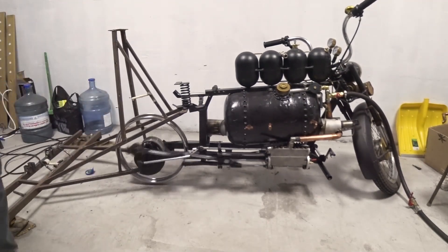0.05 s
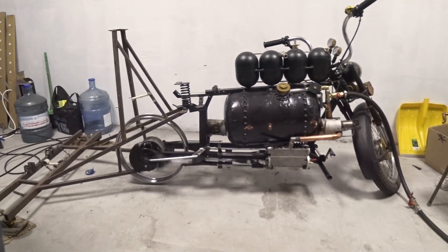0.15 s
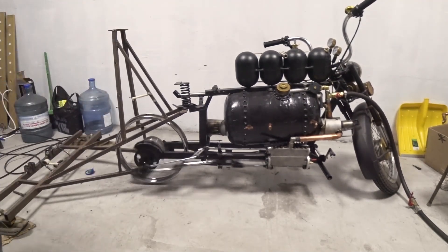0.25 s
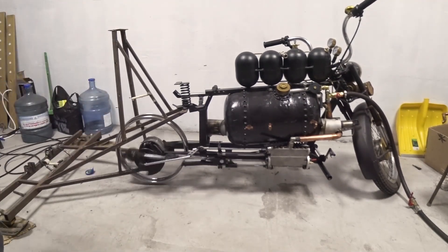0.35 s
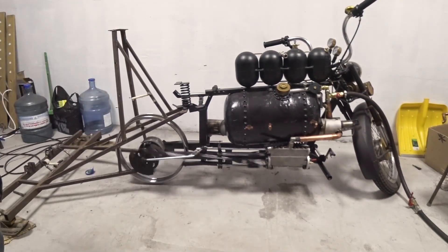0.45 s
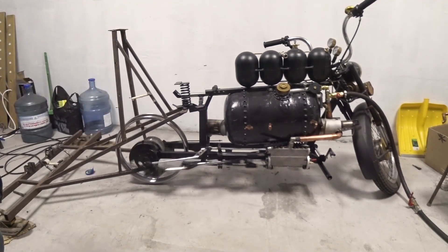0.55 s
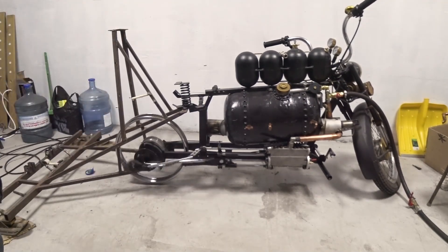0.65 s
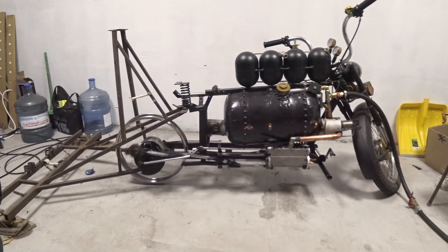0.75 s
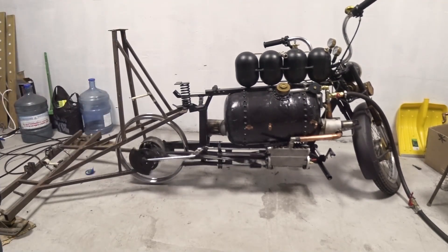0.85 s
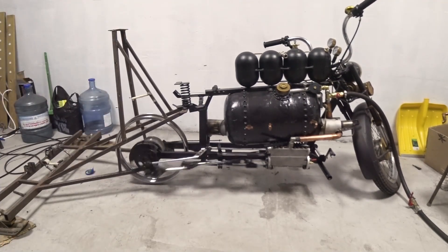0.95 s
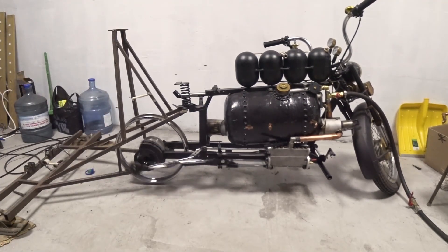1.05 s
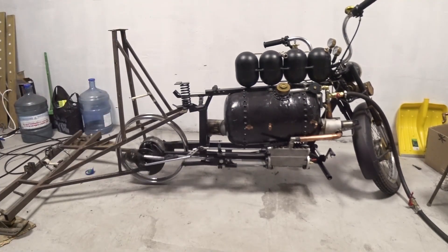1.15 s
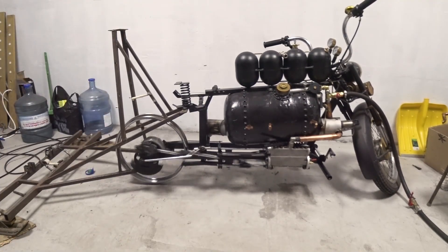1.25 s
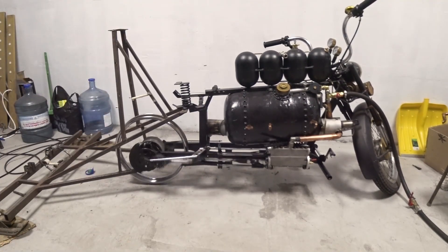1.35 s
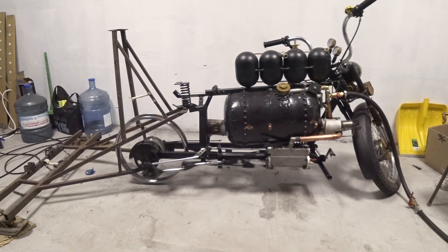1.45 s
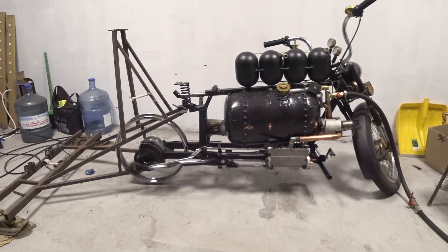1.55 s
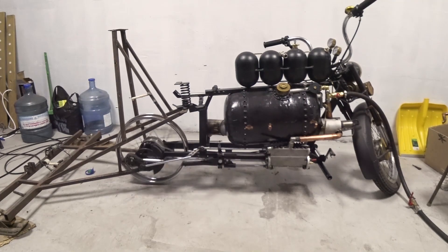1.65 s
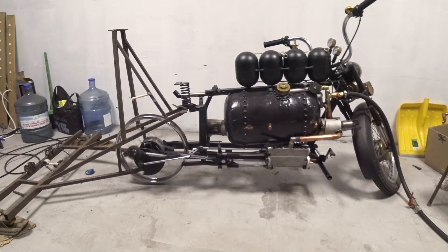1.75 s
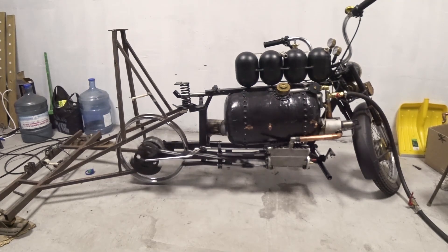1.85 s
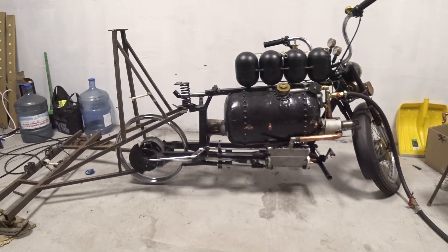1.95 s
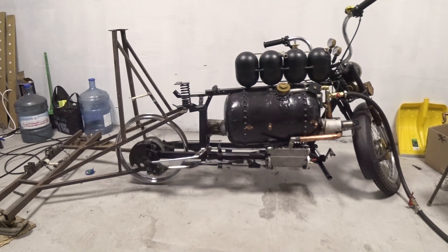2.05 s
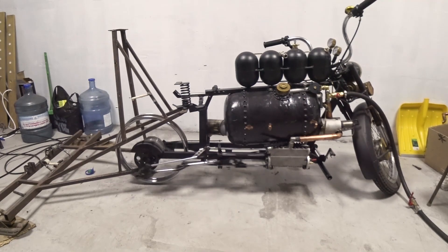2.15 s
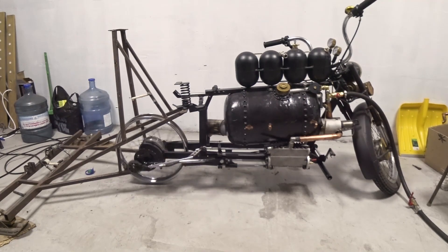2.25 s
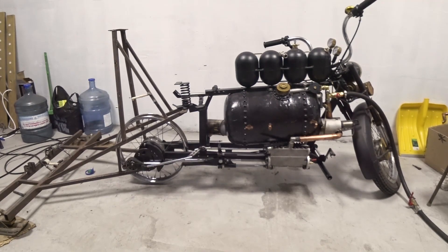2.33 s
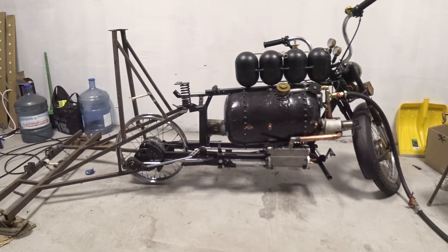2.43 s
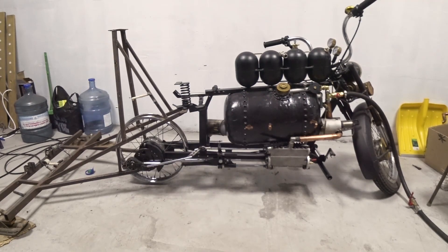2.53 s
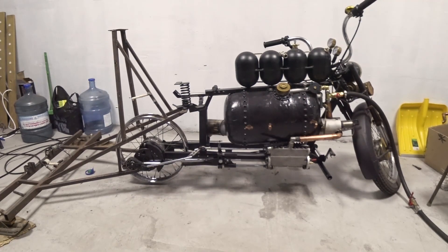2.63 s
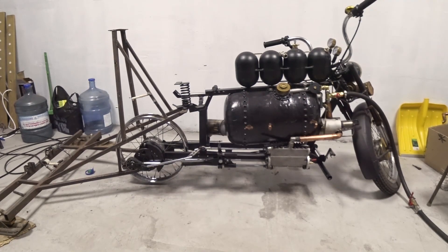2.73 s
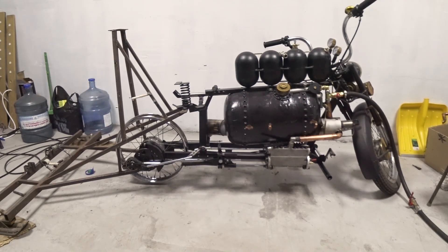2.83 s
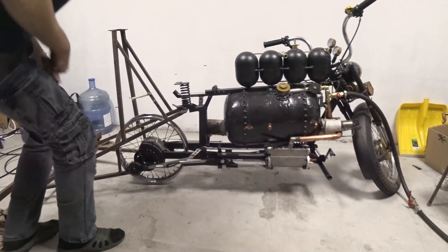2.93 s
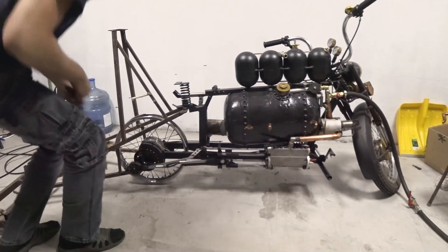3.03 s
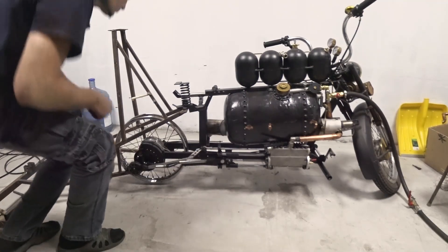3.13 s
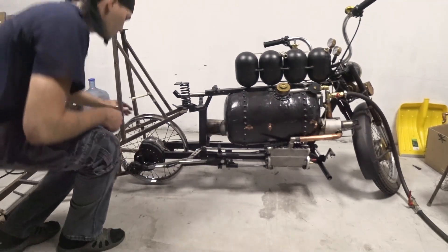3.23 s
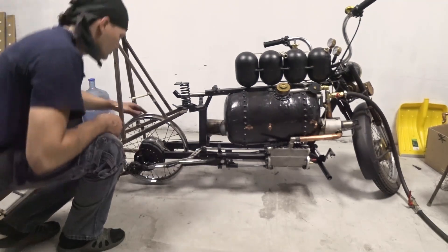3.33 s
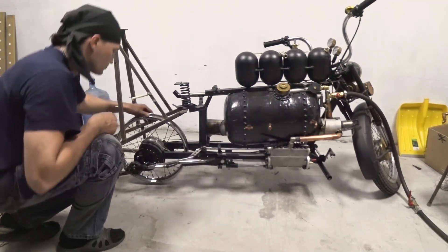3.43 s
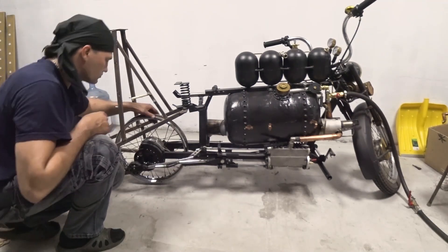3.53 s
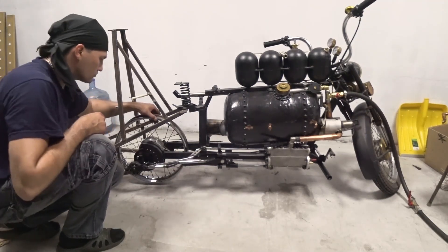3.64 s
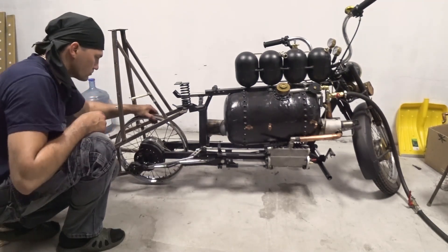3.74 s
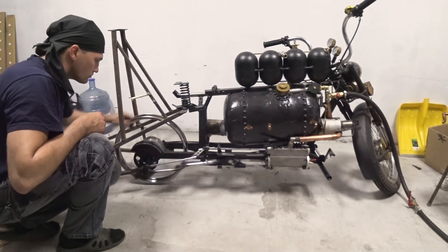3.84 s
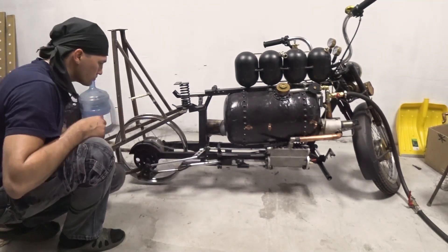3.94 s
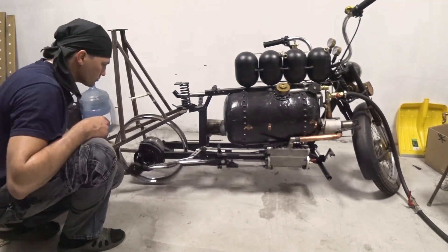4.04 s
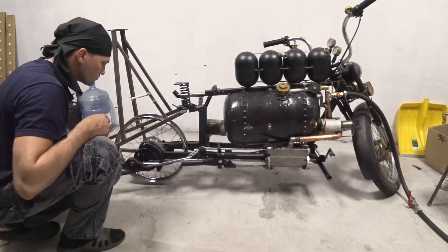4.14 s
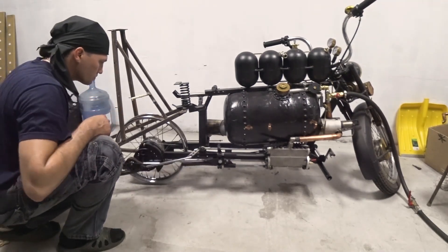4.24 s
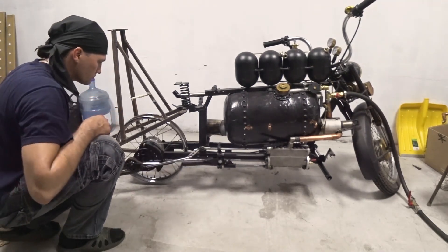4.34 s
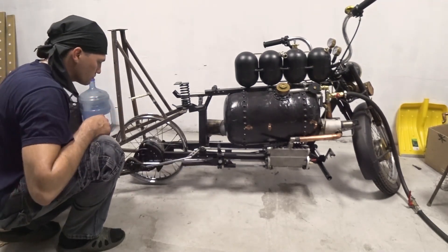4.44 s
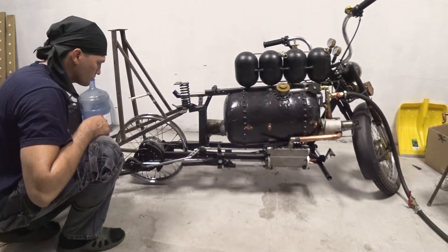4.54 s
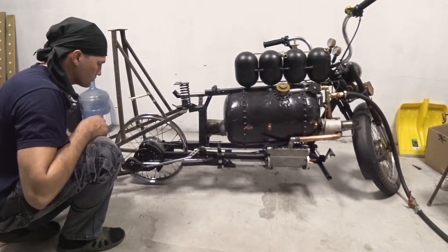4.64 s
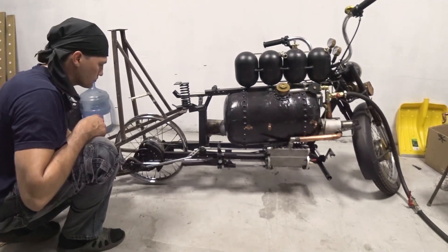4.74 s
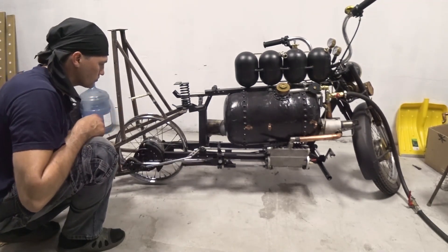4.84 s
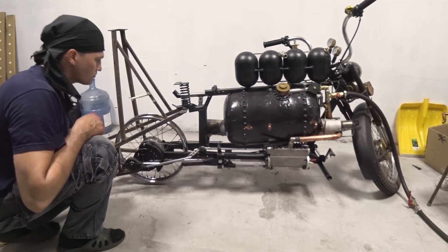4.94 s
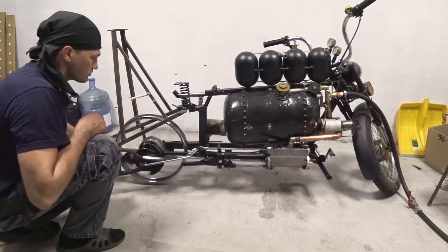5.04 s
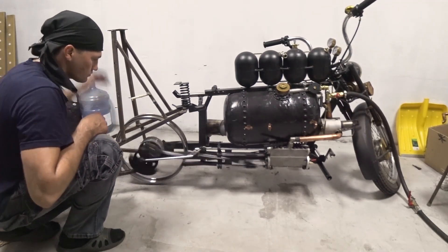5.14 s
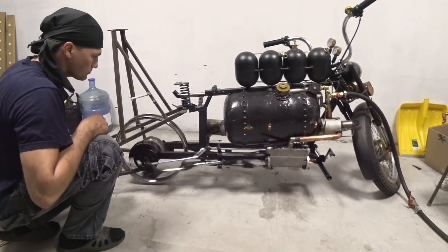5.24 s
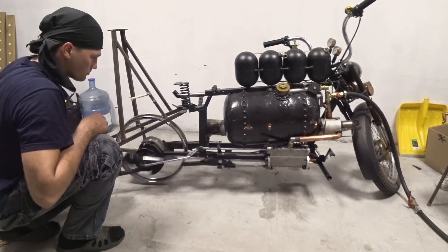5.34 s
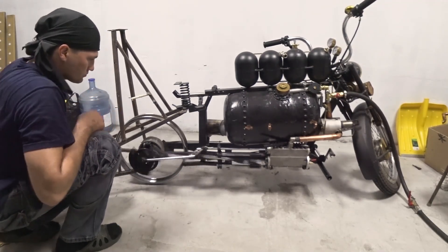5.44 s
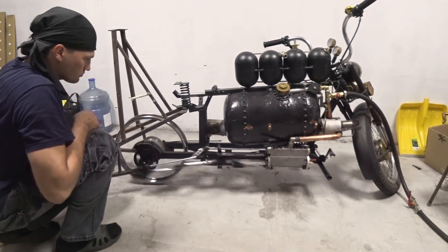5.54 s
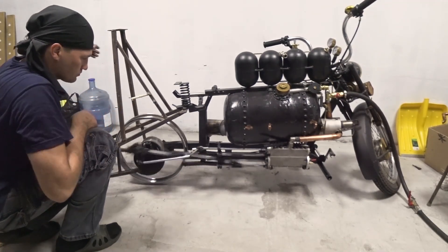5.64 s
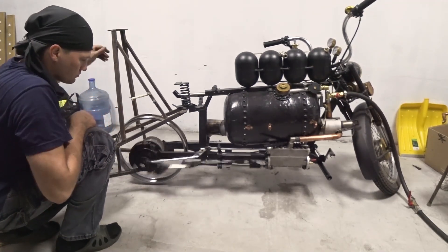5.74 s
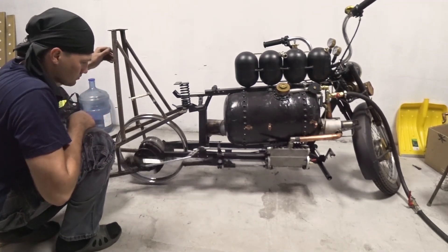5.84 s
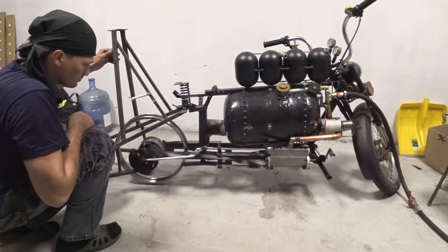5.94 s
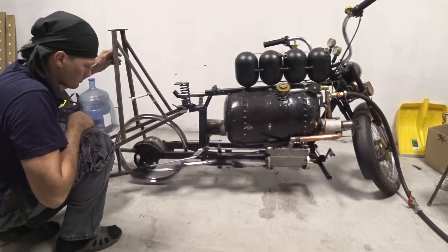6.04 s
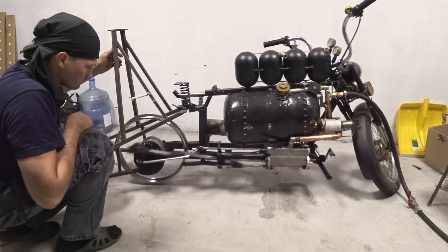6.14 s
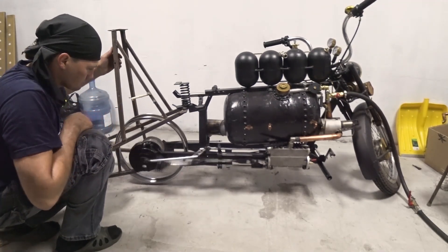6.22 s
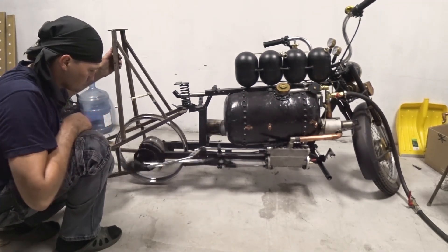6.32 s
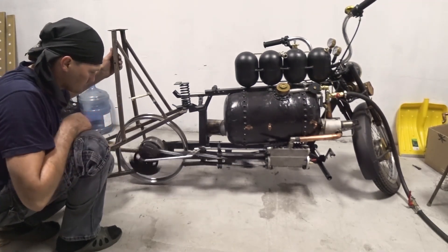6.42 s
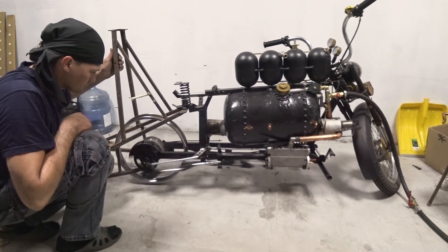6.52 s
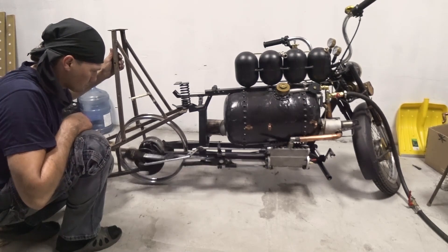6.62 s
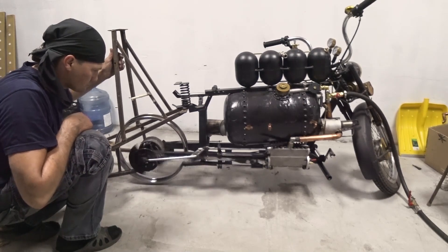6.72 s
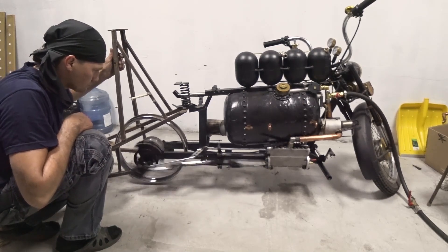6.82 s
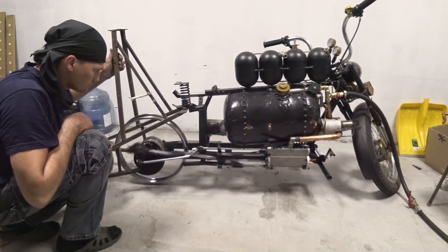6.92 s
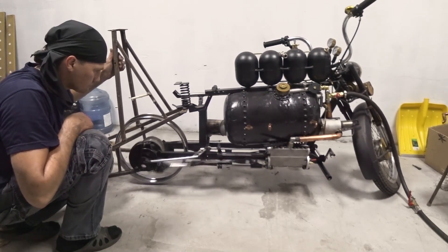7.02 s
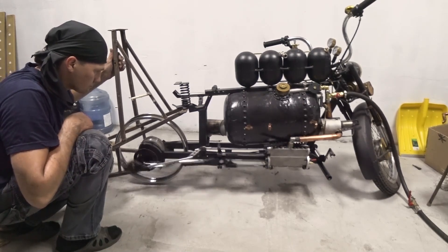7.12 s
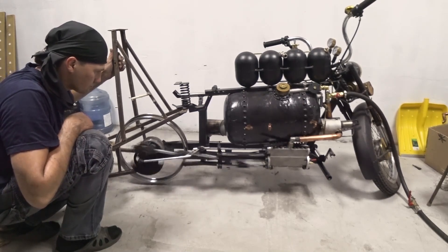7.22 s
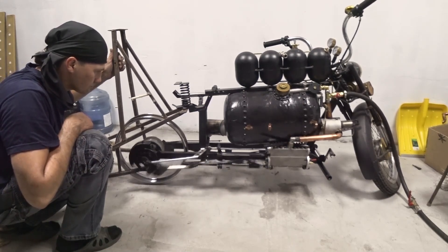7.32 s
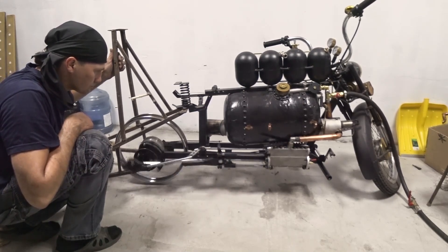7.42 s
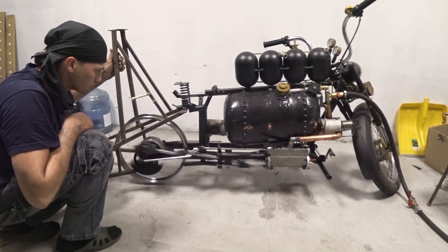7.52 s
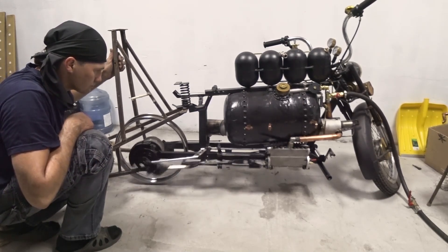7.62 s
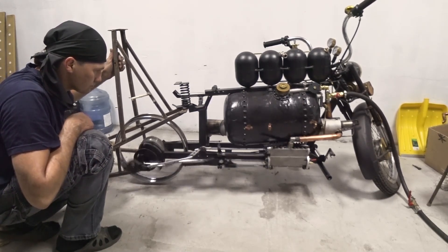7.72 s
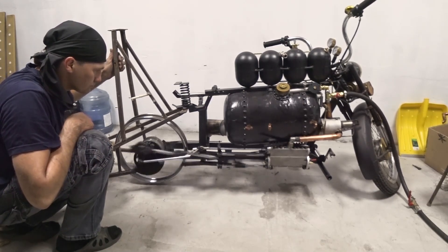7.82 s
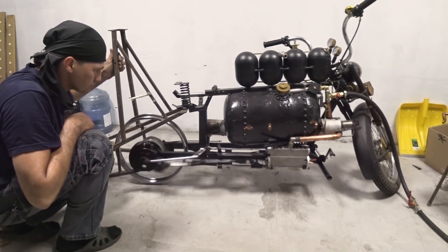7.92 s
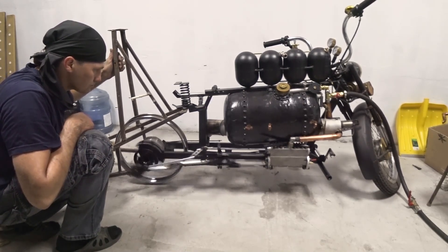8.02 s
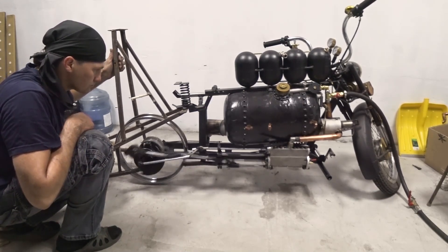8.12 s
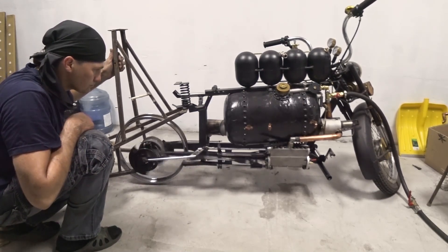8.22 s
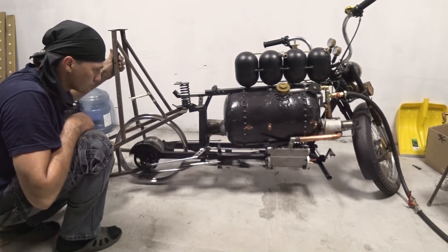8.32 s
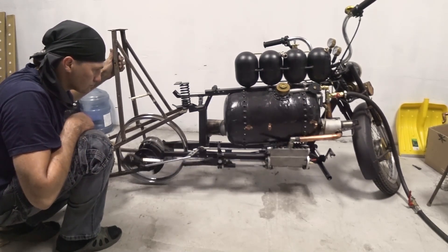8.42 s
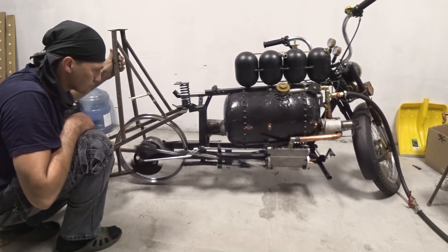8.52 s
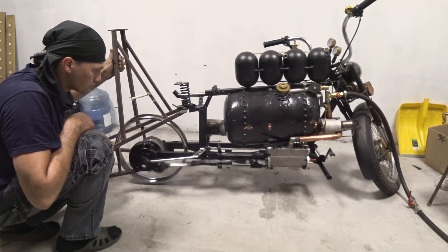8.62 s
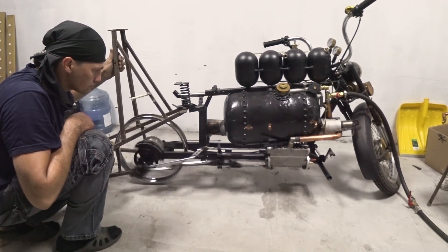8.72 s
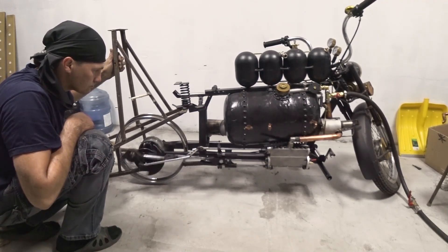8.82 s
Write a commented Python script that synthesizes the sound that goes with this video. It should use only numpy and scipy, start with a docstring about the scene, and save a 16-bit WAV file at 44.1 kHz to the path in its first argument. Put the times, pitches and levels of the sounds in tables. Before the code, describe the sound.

Rhythmic blasts of escaping air dominate: a short hollow inlet rush, a valve crack with a piercing spit, then a broad, high hiss cut off as the cylinder empties. The beats slow and stop, leaving thin whistles, hollow line howl, small metallic clicks and low drone. After a single puff and a snap, the engine restarts fast and strong, then slackens. Close, mono-like pickup with pumping gain in a short-echoing garage.

```python
"""A homemade piston engine runs on compressed air straight ahead: it slows, stalls, is fed and picks up.
Each turn the exhaust valve cracks with a whistling spit, then dumps the cylinder in a hissing blast.
Inlet rush, valve clicks, leaks at rest and the hiss of the feed line are shaped noise in a hard garage.
The feed line's howl, the shaking frame, a machine drone and room noise are added dry, with no garage echo.
The recorder's gain control ducks everything under each blast; both channels are alike."""
import sys
import numpy as np
from scipy import signal
from scipy.fft import rfft, irfft, next_fast_len
from scipy.io import wavfile
from scipy.ndimage import uniform_filter1d

SR = 44100
rng = np.random.default_rng(int(sys.argv[2]) if len(sys.argv) > 2 else 0)


def to_wav(sig):
    """Store sig (one row per channel, or 1-D mono) as 16-bit WAV at the path in sys.argv[1].

    Samples outside -1..1 are clipped; the rate is SR.
    """
    pcm = np.clip(np.atleast_2d(sig), -1, 1) * 32767
    pcm = np.round(pcm).astype(np.int16)
    wavfile.write(sys.argv[1], SR, pcm.T)  # frames by channels


N = 391160
TIME, FREQS = np.arange(N) / SR, np.fft.rfftfreq(N, 1 / SR)

# Levels in the colour and resonance tables are relative: each layer is brought to rms 1 before its own level.
# A resonance's width is the distance from its centre to half amplitude.

# Noise of the room. Each row: frequency in Hz, density in dB per Hz.
ROOM_COLOUR = [(20, -10), (60, 1), (110, -17), (170, -8.5), (260, -17), (420, -20.5), (750, -18.5),
               (1300, -33), (2200, -30), (3000, -32.5), (8000, -31), (15000, -45)]
# Machine drone in the garage. Each row: frequency in Hz, relative level in dB.
DRONE_PARTIALS = [(26.5, -39.5), (45.2, -49), (90.4, -45), (135.6, -47)]
# Swell of that drone. Each row: time in seconds, gain in dB.
DRONE_SWELL = [(0, -4), (1.9, -12), (2.5, -2), (3.2, -3.5), (3.8, 4.5), (5.1, 4.5), (5.6, 1), (8.87, -4)]
# Rumble of crank and wheel. Each row: frequency in Hz, density in dB per Hz.
RUMBLE_COLOUR = [(15, -36), (27, -61), (38, -8), (60, 3.5), (90, -15), (145, -3.5), (220, -19.5),
                 (600, -20.5), (1500, -20.5)]
# Swell of the rumble through a turn. Each row: turns after the exhaust, gain in dB.
TURN_SWELL = [(0, 3), (.25, 0), (.42, -7), (.52, 1.5), (.75, 0), (1, 1)]
# Hiss of the open feed line. Each row: frequency in Hz, density in dB per Hz.
FEED_COLOUR = [(30, -12), (75, 6.5), (130, -2), (220, -6.5), (700, -7), (1300, -3.5), (2000, -4.5),
               (3200, -10.5), (5500, -3), (7500, 2), (9500, 1.5), (10700, -5), (12300, -2), (14000, -13),
               (15700, -7.5)]
# Hollow howl of the feed line. Each row: frequency in Hz, width in Hz, level in dB.
HOWL_NOTES = [(875, 19.5, -5.5), (978, 19, -8.5), (1096, 16, -4.5), (1159.6, 20, 2.5), (1237, 18, -10),
              (1333, 40, -14), (1745, 20, -15)]
# The feed line is opened and stays open. Each row: time in seconds, hiss level in dB, howl level in dB.
FEED_FLOW = [(2.936, -19.5, -28), (2.95, -20.5, -29.5), (3.2, -26, -27), (3.5, -26, -27.5),
             (4.7, -27.5, -28.5), (5.2, -22, -28), (5.5, -15, -41), (7.6, -24.5, -34), (8.87, -31, -38)]
# Whistles of the leak with the piston at rest. Each row: frequency in Hz, width in Hz, level in dB.
SLACK_LEAK_NOTES = [(3480, 40, -19), (3750, 30, -13), (4480, 25, -3), (4830, 30, -11), (5180, 30, -10),
                    (7190, 140, -5), (7480, 180, -3), (8360, 55, 0), (8780, 150, -2), (9790, 150, -9),
                    (11100, 83, -10), (12200, 75, -3), (14550, 110, -19)]
# The same leak with the cylinder under pressure. Each row: frequency in Hz, width in Hz, level in dB.
STRAINED_LEAK_NOTES = [(3550, 35, -11), (5250, 90, -4.5), (7500, 110, 0), (8020, 50, 0), (8920, 190, 1),
                       (10000, 110, -9), (11970, 80, -4), (12380, 70, -4)]
# Leaks while the piston lingers or rests. Each row: start in seconds, end in seconds, swell in seconds,
# level in dB, share of the strained notes from 0 to 1.
RESTS = [(1.6, 1.97, .2, -32.5, .02), (2.3, 2.934, 0.56, -30.5, 0.2), (2.935, 3.92, 0.19, -25.5, 1),
         (4.2, 5.18, 0.37, -29, 0.07)]
# Snaps of the valve gear. Each row: start in seconds, level in dB, decay time in seconds.
CLICKS = [(0.851, -18, 0.0016), (1.289, -17.5, 0.0071), (1.871, -14.5, 0.0058), (3.033, -16.5, 0.013),
          (3.825, -24, 0.0067), (5.043, -19.5, 0.007), (5.171, -9.5, 0.0048)]
# Colour of those snaps. Each row: frequency in Hz, density in dB per Hz.
CLICK_COLOUR = [(150, -4), (600, -18), (1300, -26), (2400, -5.5), (4000, -13), (7500, -1.5), (10000, -7),
                (12500, -5), (15500, -32)]
# Air rushing into the cylinder. Each row: frequency in Hz, density in dB per Hz.
RUSH_COLOUR = [(40, -19), (140, -0.5), (300, -3), (500, 3.5), (650, 3), (850, 3), (1100, 2), (1800, 1.5),
               (2500, -4.5), (4000, 1), (5600, 1), (9000, -15), (15700, -45)]
# Hollow notes of the valve chest. Each row: frequency in Hz, width in Hz, level in dB.
CHEST_NOTES = [(390, 31, -17.5), (513, 25, -1.5), (632, 23, 6), (1107, 43, 4.5), (2510, 380, -2)]
# Piston pushing out the last air. Each row: frequency in Hz, density in dB per Hz.
SWEEP_COLOUR = [(100, -16), (500, -9), (1300, -8), (3000, -9), (4100, -4.5), (4900, 5.5), (6300, 4.5),
                (8000, 6.5), (9500, 7.5), (11000, 4), (13200, -11), (15700, -17)]
# Notes of the exhaust valve's seat. Each row: frequency in Hz, width in Hz, level in dB.
SEAT_NOTES = [(5840, 840, 9), (10400, 470, 11)]
# Exhaust through the barely open valve. Each row: frequency in Hz, density in dB per Hz.
WHISTLE_COLOUR = [(500, -24), (3000, -22.5), (4400, -16), (5700, -3), (6900, -19.5), (7700, -6.5),
                  (8800, -23.5), (9600, 2.5), (10250, 4), (11300, -7), (13200, -6), (15700, -13)]
# Exhaust through the wide open valve. Each row: frequency in Hz, density in dB per Hz.
BLAST_COLOUR = [(100, -46), (500, -19), (1300, -11), (2800, -13.5), (3900, -8.5), (4900, -8), (6500, 0),
                (8400, 3), (10000, 3.5), (11300, 2), (13300, 5.5), (14000, -2.5), (15700, -2.5)]
# Narrow fixed peaks that ring in the exhaust hiss. Each row: frequency in Hz, width in Hz, level in dB.
PEAK_NOTES = [(4928, 20, -8), (5890, 200, -6), (6520, 50, -5), (9087, 30, -7), (10193, 70, 0),
              (11000, 90, -7), (11900, 150, -7), (13044, 60, -3), (13311, 35, -4), (13497, 40, -4)]
# The turns of the engine. Each row: time the exhaust valve cracks in seconds, relative cylinder pressure
# in dB, how long the piston keeps pushing air out in seconds.
STROKES = [ (-.115, -3, 0.054), (.192, -5.5, 0.069), (0.53, -5, 0.074), (.913, -6, 0.081),
           (1.372, -4.5, 0.12), (1.962, -5, 0.21), (3.881, -0.5, 0.22), (5.223, 3.5, 0.14),
           (5.509, 0, 0.11), (5.769, 2.5, 0.11), (6.016, 4, 0.13), (6.265, 7.5, 0.12), (6.516, 5.5, 0.13),
           (6.78, 5, 0.11), (7.052, -1, 0.11), (7.336, -1.5, 0.1), (7.634, -3, 0.095), (7.95, -5.5, 0.095),
           (8.282, -7, 0.11), (8.638, -4, 0.1)]

# Valve timing: the inlet opens a share of a turn ahead; the exhaust is wide open a delay plus a share later.
INLET_TURNS, WIDE_DELAY_S, WIDE_TURNS, LONGEST_TURN_S = 0.1634, 0.0051, 0.09, 0.576
# The exhaust cracks in CRACK_S at the usual turn; the time follows a power law of the turn's length.
USUAL_TURN_S, CRACK_S, CRACK_POWER = 0.34, 0.0081, 1.87
# After a gap longer than STALL_S the crank starts from rest, and the inlet opens START_LEAD_S ahead.
STALL_S, START_LEAD_S = 1.0, 0.054
EMPTY_DB_PER_S = 88.5  # draining of the cylinder once the piston stops pushing
EDGE_HZ = 15900  # upper band limit of the recorder


def amp(db):
    """Decibels to gain."""
    return 10 ** (np.asarray(db) / 20)


def unit(x):
    """Scales to rms 1."""
    return x / np.sqrt(np.mean(x ** 2) + 1e-20)


def level(rows, axis=1):
    """Gain along a curve of seconds and dB, silent outside it."""
    columns = np.transpose(rows)
    inside = (TIME >= columns[0][0]) & (TIME <= columns[0][-1])
    return amp(np.interp(TIME, columns[0], columns[axis])) * inside


def hiss(colour):
    """Turbulent air as noise of a given colour, rms 1."""
    hz, db = np.transpose(colour)
    gain = amp(np.interp(np.log(FREQS + 1), np.log(hz), db))
    return unit(irfft(rfft(rng.standard_normal(N)) * gain, N))


def ringing(notes):
    """Turbulence exciting a set of resonances, rms 1."""
    power = sum(amp(db) ** 2 / (1 + ((FREQS - hz) / width) ** 2) ** 2 for hz, width, db in notes)
    return unit(irfft(rfft(rng.standard_normal(N)) * np.sqrt(power), N))


def wander(rate_hz):
    """Slow random drift below about the given rate, rms 1."""
    return unit(irfft(rfft(rng.standard_normal(N)) / (1 + (FREQS / rate_hz) ** 4), N))


def burst(start, rise, fall_db_per_s, length=0.9, hold=0):
    """Envelope of a release of air: a straight rise, then a drain in dB once the hold has passed."""
    out = np.zeros(N)
    during = slice(*np.searchsorted(TIME, [start, start + length]))
    age = TIME[during] - start
    opening = np.clip(age / max(rise, 1 / SR), 0, 1)
    out[during] = opening * amp(-fall_db_per_s * np.maximum(age - hold, 0))
    return out


def strokes():
    """Valve timing from the crank's pace: (s, pressure dB, push s, inlet lead s, crack s, wide open after s)."""
    starts, pressure_db, push = np.transpose(STROKES)
    gaps = np.diff(starts)
    before, after = np.r_[gaps[0], gaps], np.r_[gaps, gaps[-1]]
    turn = np.minimum(before, after)
    crack = CRACK_S * (turn / USUAL_TURN_S) ** CRACK_POWER
    turn = np.minimum(turn, LONGEST_TURN_S)
    lead = np.where(before > STALL_S, START_LEAD_S, INLET_TURNS * turn)
    wide_after = WIDE_DELAY_S + WIDE_TURNS * turn
    return zip(starts, pressure_db, push, lead, crack, wide_after)


def inflow(rise=0.0035, fall=1.7, overlap=0.0092):
    """Flow through the inlet valve, stronger with pressure, until just after the exhaust cracks."""
    return sum(amp(pressure_db) * burst(s - lead, rise, fall, length=lead + overlap)
               for s, pressure_db, _, lead, _, _ in strokes())


def background(floor_db=-42, waver_db=4.3):
    """A low machine drone, each partial wavering in level and phase, over the noise of the room."""
    drone = 0
    for hz, db in DRONE_PARTIALS:
        gain = amp(db + waver_db * wander(5.1))
        drone = drone + gain * np.sin(2 * np.pi * hz * TIME + 0.5 * wander(3.4))
    return np.sqrt(2) * level(DRONE_SWELL) * drone + amp(floor_db) * hiss(ROOM_COLOUR)


def crank(rumble_db=-26, db_per_doubling=12):
    """Crank and wheel shake the frame, more the faster they turn and most around the exhaust."""
    starts = [row[0] for row in STROKES]
    starts = np.array([*starts, 2 * starts[-1] - starts[-2]])  # one more turn at the last pace
    turn, angle = np.divmod(np.interp(TIME, starts, np.arange(len(starts))), 1)
    doublings = np.log2(USUAL_TURN_S / np.diff(starts)).take(turn.astype(int), mode="clip")
    swell_db = np.interp(angle, *np.transpose(TURN_SWELL))
    return amp(rumble_db + db_per_doubling * doublings + swell_db) * hiss(RUMBLE_COLOUR)


def howl(throb_db=0.6, draw=0.11):
    """Air flowing in the feed line sounds hollow unsteady notes, louder when the cylinder draws on it."""
    drawn = level(FEED_FLOW, axis=2) * (1 + draw * inflow())
    return drawn * ringing(HOWL_NOTES) * amp(throb_db * wander(42))


def feed_hiss():
    """Turbulent air hisses from the open feed line."""
    return level(FEED_FLOW) * hiss(FEED_COLOUR)


def leaks(waver_db=1.2):
    """Air whistles past the seats of the resting valves; the notes change with the pressure on them."""
    slack, strained = ringing(SLACK_LEAK_NOTES), ringing(STRAINED_LEAK_NOTES)
    air = np.zeros(N)
    for start, end, swell, db, share in RESTS:
        notes = (1 - share) * slack + share * strained
        air += amp(db) * burst(start, swell, 0, length=end - start) * notes
    return air * amp(waver_db * wander(18))


def clicks():
    """Short metallic snaps of the valve gear: noise dying away exponentially."""
    snaps = sum(amp(db) * (TIME >= s) * np.exp(-abs(TIME - s) / decay) for s, db, decay in CLICKS)
    return hiss(CLICK_COLOUR) * snaps


def intake(rush_db=-25, chest_db=-4, thump_db=-5):
    """Air rushes in ahead of each exhaust, rings the valve chest and thumps the piston."""
    rush = unit(hiss(RUSH_COLOUR) + amp(chest_db) * ringing(CHEST_NOTES))
    thump = amp(thump_db) * hiss(RUMBLE_COLOUR)
    return amp(rush_db) * inflow() * (rush + thump)


def sweep(sweep_db=-1.5, rise_share=1.0, peaks_db=-17):
    """The returning piston pushes out the last air with a duller hiss that swells, then drains away."""
    flow = np.zeros(N)
    for s, _, push, _, _, wait in strokes():
        push_out = burst(s + wait, rise_share * push, EMPTY_DB_PER_S, hold=push - wait)
        flow = np.maximum(flow, push_out)
    return amp(sweep_db) * flow * (hiss(SWEEP_COLOUR) + amp(peaks_db) * ringing(PEAK_NOTES))


def seep(seep_db=-24, follow=0.27, lead=0.06, sing_db=-17, dwell_power=0.24, sing_rise=0.018, sing_fall=200):
    """The exhaust seat sings faintly around the crack, then sings out, louder when the valve opens slowly."""
    flow = np.zeros(N)
    for s, pressure_db, _, _, crack, wait in strokes():
        flow += amp(seep_db + follow * pressure_db) * np.exp(-abs(TIME - s) / lead)
        dwell = (crack / CRACK_S) ** dwell_power
        flow += amp(sing_db) * dwell * burst(s, sing_rise, sing_fall, length=0.3, hold=wait)
    return flow * ringing(SEAT_NOTES)


def exhaust(whistle_db=-2.5, whistle_follow=0.48, whistle_fall=120,
            spit_db=-4, spit_fall=450, spit_rise=0.017,
            blast_db=3, blast_follow=0.05, blast_rise=0.036, blast_fall=35,
            gush_db=-5, gush_rise=0.005, gush_fall=350, peaks_db=-9, flutter_db=1.0):
    """The valve spits and whistles through its first slit, then gushes wide and the cylinder blows down."""
    slit, wide = np.zeros(N), np.zeros(N)
    for s, pressure_db, push, _, crack, wait in strokes():
        first = amp(whistle_db + whistle_follow * pressure_db)
        slit += first * burst(s, crack, whistle_fall, length=0.56, hold=crack)
        # the spit already has the colour of the wide open valve
        wide += first * amp(spit_db) * burst(s, crack + spit_rise, spit_fall, length=0.14, hold=crack)
        wide += amp(gush_db) * burst(s + wait, gush_rise, gush_fall, length=0.15, hold=gush_rise)
        emptying = burst(s, crack, EMPTY_DB_PER_S, hold=push)
        blast = burst(s + wait, blast_rise, blast_fall) * emptying
        wide += amp(blast_db + blast_follow * pressure_db) * blast
    jet = unit(hiss(BLAST_COLOUR) + amp(peaks_db) * ringing(PEAK_NOTES))
    return (slit * hiss(WHISTLE_COLOUR) + wide * jet) * amp(flutter_db * wander(48))


def garage(x, wet_db=-5.0, t60=0.27):
    """Direct sound plus dense reflections off the concrete floor and walls, decaying 60 dB in t60 seconds."""
    age = TIME[:SR // 2]
    taps = rng.standard_normal(len(age)) * (rng.random(len(age)) < 0.1) * (age > 0.002)
    taps *= amp(-60 * age / t60)
    size = next_fast_len(N + SR)
    response = 1 + amp(wet_db) * rfft(taps / np.linalg.norm(taps), size)
    # the reflections carve fine ripples into the hiss but leave its broad colour alone
    response /= np.sqrt(uniform_filter1d(abs(response) ** 2, size=5000))
    return irfft(rfft(x, size) * response, size)[:N]


def scene():
    """The engine stands straight ahead, alike in both channels; only its air sounds pass through the garage."""
    air = exhaust() + seep() + sweep() + intake() + clicks() + leaks() + feed_hiss()
    mono = garage(air) + howl() + crank() + background()
    return np.array([mono, mono])


def record(dry, threshold_db=-14.0, squeeze=0.88, attack=0.0061, recovery_db_per_s=120, sense=0.0013):
    """Gain control turns down each blast and all beneath it, then recovers; clipping and band limit follow."""
    def lag(x, seconds):
        """One-pole smoothing with a time constant in seconds."""
        keep = np.exp(-1 / (seconds * SR))
        return signal.lfilter([1 - keep], [1, -keep], x)

    power_db = 10 * np.log10(lag(dry[0] ** 2, sense) + 1e-12)
    # the sensed level rises at once and falls no faster than the recovery rate
    ramp = TIME * recovery_db_per_s
    sensed_db = np.maximum.accumulate(power_db + ramp) - ramp
    excess_db = np.maximum(sensed_db - threshold_db, 0)
    settled_db = excess_db[:SR // 100].max()  # the control starts already settled
    reduction_db = squeeze * (settled_db + lag(excess_db - settled_db, attack))
    ducked = np.clip(dry * amp(-reduction_db), -1, 1)
    lowpass = signal.firwin(511, EDGE_HZ, window=("kaiser", 9), fs=SR)
    return signal.oaconvolve(ducked, lowpass[None], "same", axes=1)


dry = scene()
out = record(dry)
to_wav(out)
```